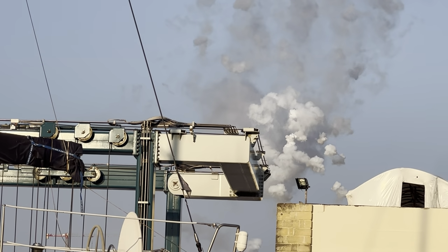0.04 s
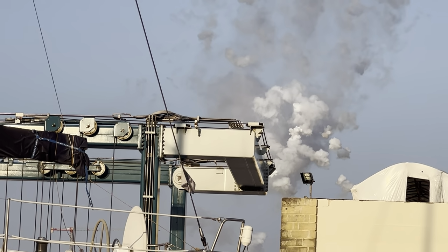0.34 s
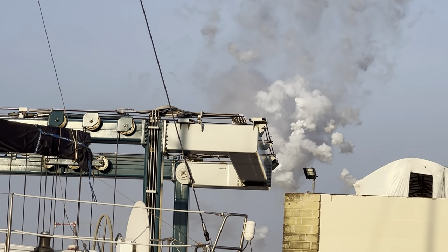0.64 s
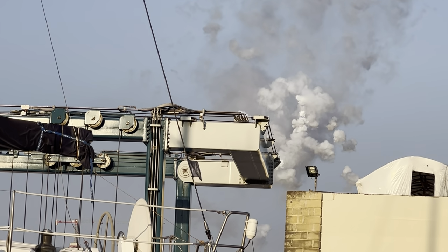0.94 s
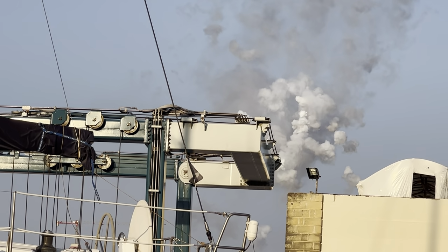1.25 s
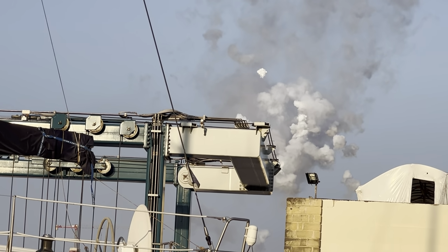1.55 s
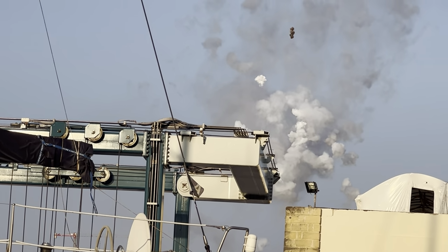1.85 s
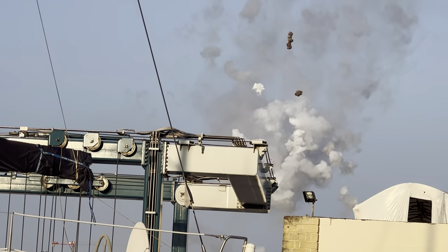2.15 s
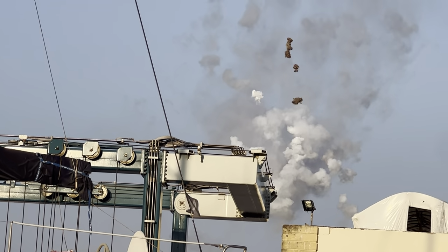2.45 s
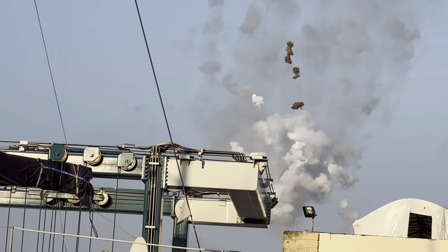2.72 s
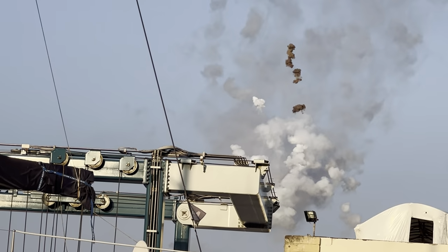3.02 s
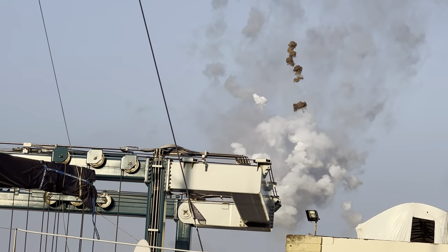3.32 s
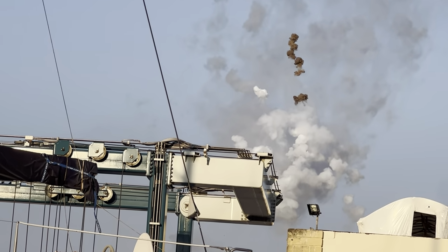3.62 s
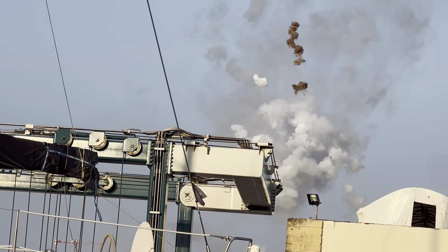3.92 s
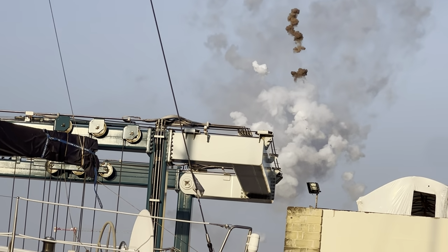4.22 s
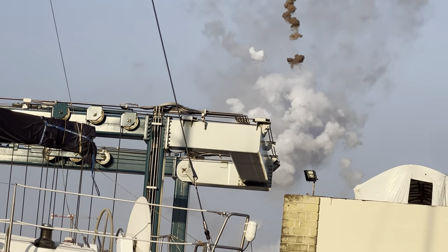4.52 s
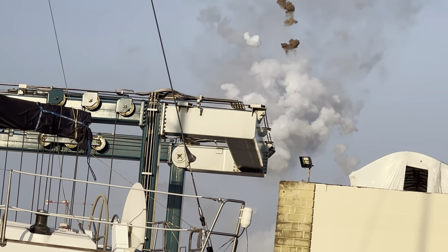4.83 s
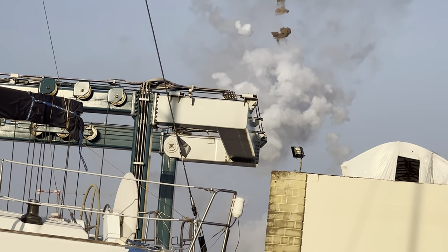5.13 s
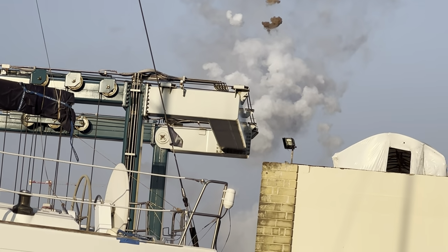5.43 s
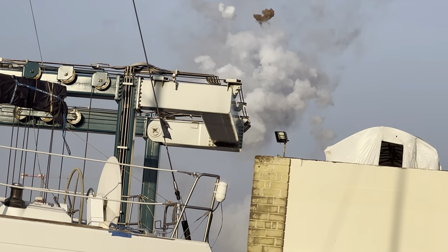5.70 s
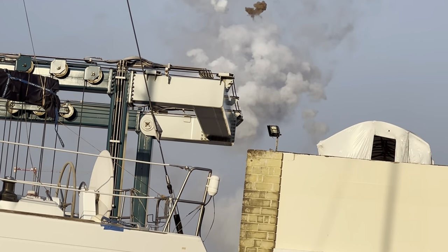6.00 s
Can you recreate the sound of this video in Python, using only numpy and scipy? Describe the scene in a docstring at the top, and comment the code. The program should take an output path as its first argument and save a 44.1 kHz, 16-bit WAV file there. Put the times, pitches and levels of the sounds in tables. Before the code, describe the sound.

Fireworks burst overhead in an open harbour, heard from the ground, with a low rumble and echoes of earlier shots already rolling at the start. Shells go off at about 0.3, 0.6, 0.7, 1.0, 1.4 and 1.5 seconds, each a sharp crack dropping into a deep boom. After a brief gap, more follow at 2.2 and 2.4 seconds, then four sharper, snappier ones at about 2.7, 3.2, 3.4 and 3.8 seconds. Nearby walls slap the shots back, boats and quays scatter them, and the far shore returns each as a duller rattling crack nearly a second later. Small snaps, ticks and distant thuds fall in between. The last shore echo arrives around 4.7 seconds. From there only muffled far thuds and a wide, lumpy rumble remain, growing duller and quieter until the end at about 6 seconds.

```python
"""A harbour by day, with firework shells bursting overhead: each is a sharp crack that sweeps down
into a deep boom. Nearby walls slap back, boats and quays scatter the sound, and the far shore
returns every shot nearly a second later. Small snaps, ticks and distant thuds fall in between.
The piled-up echoes roll on as a rumble that dulls and fades once the last shell has burst."""
import sys
import numpy as np
from scipy import signal
from scipy.fft import rfft, irfft, next_fast_len
from scipy.io import wavfile
from scipy.ndimage import uniform_filter1d, map_coordinates

SR = 44100
rng = np.random.default_rng(int(sys.argv[2]) if len(sys.argv) > 2 else 0)


def put_to_file(sound):
    """Save the sound as 16-bit audio at rate SR, in the file named by the first command-line argument."""
    columns = np.atleast_2d(sound).T  # one column per channel
    safe = np.clip(columns, -1, 1)
    whole_steps = np.round(safe * 32767)
    wavfile.write(sys.argv[1], SR, whole_steps.astype(np.int16))


N = 271656

# The shells overhead; those before time 0 leave only their echoes. Columns: start_s, crack_db,
# crack_length_s, knock_db, boom_db, shore_delay_s, shore_db, near_wall_db, far_wall_db
SHELLS = [(-.8, -9, .004, -6, -2, .885, .5, -30, -30), (-.5, -14.5, .004, -23, -1, .872, 4, -30, -30),
          (-.151, -10, .004, -24, -13, .884, -8, -30, -31),
          (.271, -8.5, .0036, -17, -.5, .869, 0, -23, -25.5),
          (.55, -13, .0058, -28, -3, .88, -2, -14.5, -33),
          (.661, -6, .005, -15.5, -.5, .885, -3.5, -28, -22),
          (1.045, -14, .0074, -14, -1, .893, 2.5, -20.5, -35),
          (1.3604, -8.5, .0044, -19.5, -1, .869, .5, -28, -22.5),
          (1.505, -13.5, .006, -12.5, -1.5, .887, 9, -28, -31),
          (2.1996, -15, 0.0044, -14, -2.5, .897, 6, -26, -30),
          (2.449, -14, .0061, -14.5, -1, .872, 3, -22, -30),
          (2.7011, -4.8, .0022, -8, -2, .869, -.8, -20, -27),
          (3.156, -2.2, 0.00073, -2.5, -9, .875, -8.5, -24, -31),
          (3.417, -6, .001, -8, -5, .884, -3.5, -24, -35),
          (3.7836, -2, .001, -5.5, -6, .876, -5.5, -26, -39)]
# The tone of the wash, the rushing sound of many blurred cracks: pitch_hz, level_db
WASH_TONE = [(290, -30.5), (500, -4.5), (812, -11.5), (969, -6), (1140, -6), (1480, -8.5), (2110, -15.5),
             (2840, -18.5), (3690, -26), (7760, -45), (8430, -47), (11000, -74), (18500, -120)]
# How wide echoes sound (side is what differs between the ears, mid what they share):
# pitch_hz, side_minus_mid_db
STEREO_WIDTH = [(50, -20), (125, -14.5), (300, -9), (450, -3.5), (600, 1.5), (950, 6), (1400, -4),
                (2000, -21), (4000, -24), (8000, -18)]


def amp(db):
    """Turn decibels into a gain to multiply by."""
    return 10 ** (np.asarray(db) / 20)


def along(points, hz):
    """Read a table of (pitch_hz, value) rows at any pitch, on a log scale."""
    pitches, values = np.transpose(points)
    return np.interp(np.log(hz + 1), np.log(pitches + 1), values)


def wobble(turns_per_s, count):
    """A smooth random curve, count samples long."""
    points = rng.standard_normal(int(count * turns_per_s / SR) + 4)
    curve = map_coordinates(points, [np.arange(0, count * turns_per_s / SR + 1, 1 / 8)], order=2)
    return np.interp(np.arange(count) * (8 * turns_per_s / SR), np.arange(len(curve)), curve)


def filtered(sound, gain_at):
    """Multiply each pitch in a sound by gain_at(hz)."""
    count = sound.shape[-1]
    size = next_fast_len(count + 8192)
    return irfft(rfft(sound, size) * gain_at(np.fft.rfftfreq(size, 1 / SR)), size)[..., :count]


def impulse(tone, size=2048):
    """A single click of energy 1 with the given tone."""
    cepstrum = np.fft.irfft(np.log(amp(along(tone, np.fft.rfftfreq(size, 1 / SR)))))
    cepstrum[1:size // 2] *= 2  # folding it in half packs the energy at the click's start
    cepstrum[size // 2 + 1:] = 0
    pulse = irfft(np.exp(rfft(cepstrum)))
    return pulse / np.linalg.norm(pulse)


def levelled(pair, window_s):
    """Hold the short-term power of a stereo sound at 1."""
    power = uniform_filter1d(np.mean(pair ** 2, 0), max(int(window_s * SR), 8))
    return pair / np.sqrt(np.abs(power) + 1e-12)


def steady_noise(tone, count, window_s=.038):
    """Even stereo noise that seems to come from all round."""
    size = next_fast_len(count, real=True)
    hz = np.fft.rfftfreq(size, 1 / SR)
    spectra = rng.standard_normal((2, 2 * len(hz))).view(complex) * amp(along(tone, hz))
    mid = irfft(spectra[0], size)[:count]
    side = irfft(spectra[1] * amp(along(STEREO_WIDTH, hz)), size)[:count]
    return levelled(np.array([mid + side, mid - side]), window_s)


def add(track, sound, start_s):
    """Mix a sound into the track, cutting off what falls outside it."""
    start = round(start_s * SR)
    lo, hi = max(start, 0), min(start + sound.shape[-1], N)
    if hi > lo:
        track[:, lo:hi] += sound[..., lo - start:hi - start]


def dulled(sound, db_per_khz):
    """Air soaks up the treble over a set distance."""
    return filtered(sound, lambda hz: amp(-db_per_khz * hz / 1000))


def through_air(sound, travel_s, air_db=1.28):
    """Air takes air_db per kHz for each second of travel; travel_s has one value per sample."""
    count = sound.shape[-1]
    hz, frame_s, spectra = signal.stft(sound, SR, nperseg=256)
    frame_travel_s = np.interp(frame_s, np.arange(count) / SR, travel_s)
    loss_db = air_db * np.outer(hz / 1000, frame_travel_s)
    return signal.istft(spectra * amp(-loss_db), SR, nperseg=256)[1][..., :count]


def rolling_echoes(lump_db=2.1, flutter_db=1.05, wash_swing=.72, dull_from_s=4.6):
    """Old echoes merge into a lumpy rumble and a wash that dulls once no new shots feed it."""
    # The rise and fall of the two layers: time_s, rumble_db, wash_db
    loudness = [(0.0, -19, -38), (0.39, -19.5, -38.5), (2.07, -23.5, -39.5), (2.59, -21, -38),
                (3.04, -24.5, -44), (3.36, -22, -42), (4.2, -25, -47), (4.68, -27.5, -47.5),
                (5.25, -31, -52.5), (5.59, -31.5, -54), (6.16, -33, -55.5)]
    # The rumble's tone: pitch_hz, level_db
    rumble_tone = [(13, -53.5), (22, -32), (27, -28), (35, -21.5), (40, -14), (53, 1.5), (70, 4.3),
                   (119, -.5), (201, -4.5), (255, -14.5), (292, -10.5), (350, -14), (800, -30.5),
                   (1040, -51), (1760, -120)]
    times_s, *levels = np.transpose(loudness)
    t = np.arange(N) / SR
    rumble_db, wash_db = [np.interp(t, times_s, column) for column in levels]
    wash_db = wash_db.mean() + wash_swing * (wash_db - wash_db.mean())  # less swing: the wash hangs on
    lumps = wobble(22, N)
    rumble = amp(rumble_db - .2 + lump_db * lumps) * steady_noise(rumble_tone, N, window_s=.06)
    wash = amp(wash_db + .2 + .5 * lumps + flutter_db * wobble(90, N)) * steady_noise(WASH_TONE, N)
    return rumble + through_air(wash, np.clip(t - dull_from_s, 0, .9), air_db=1.0)


def hump(t, rise_s):
    """A loudness curve that climbs to 1 at rise_s, then dies away."""
    return t / rise_s * np.exp(1 - t / rise_s)


def thuds():
    """Far thuds, and every shell's return from the hills, arrive smeared and dull."""
    # Single dull thuds from far off, many of them the shells' echoes off shore and hills:
    # start_s, deep_db, hollow_db, crack_db
    far_thuds = [(.208, -23, -17, -30.5), (.91, -18, -26, -51), (1.762, -21, -25, -44),
                 (2.555, -25, -22, -48), (3.052, -18.5, -37, -56.5), (3.328, -22, -19, -36),
                 (4.168, -21.5, -21.5, -54), (4.328, -24, -17, -44), (4.43, -24, -29, -56),
                 (4.635, -21, -38, -58), (4.695, -21, -23, -48), (4.76, -30, -30, -52),
                 (4.925, -26, -37, -58), (5.068, -24, -27.5, -49), (5.155, -28, -24.5, -50),
                 (5.44, -25, -40, -48), (5.625, -30, -30.5, -58), (5.765, -25, -36, -53),
                 (5.845, -36, -30, -55), (5.908, -29, -24.5, -54), (6.055, -33, -32, -58),
                 (6.112, -33, -32, -49)]
    # Echoes off shore and hills, relative to a shell's bass: delay_s, deep_db, hollow_db, crack_db
    hills = [(.905, -17, -18, -35), (1.289, -23, -30, -45), (1.366, -28, -30, -50), (1.48, -28, -28.5, -52),
             (1.655, -25, -34, -43), (2.069, -25, -28, -57)]
    # The tones of a thud's deep part and hollow part: pitch_hz, level_db
    deep_tone = [(25, -31.5), (60, -1), (100, 1.5), (150, -5.5), (250, -24.5), (1000, -88.5)]
    hollow_tone = [(80, -28), (150, 2), (195, 4), (240, -1), (300, -3.5), (380, -5), (500, -18.5),
                   (900, -32), (2500, -71)]
    arrivals = list(far_thuds)
    for start_s, _, _, knock_db, boom_db, *_ in SHELLS:
        for delay_s, *levels in hills:
            arrivals.append((start_s + delay_s, *(np.array(levels) + bass_level(knock_db, boom_db))))
    powers = np.zeros((3, N))
    shape = hump(np.arange(SR // 5) / SR, rise_s=.012)
    for start_s, *levels in arrivals:
        add(powers, np.outer(amp(levels), shape) ** 2, start_s)
    tones = [deep_tone, hollow_tone, WASH_TONE]
    sound = sum(np.sqrt(power) * steady_noise(tone, N) for power, tone in zip(powers, tones))
    return dulled(sound, db_per_khz=1.5)


def zings(pitch_hz=2900, waver_hz=380):
    """Evenly spaced ribs on the far shore return a crack as a few milliseconds of rough tone."""
    # The short rings: start_s, level_db
    rings = [(1.187, -28), (1.582, -32)]
    out, t = np.zeros((2, N)), np.arange(SR // 20) / SR
    for start_s, level_db in rings:
        hz = pitch_hz + waver_hz * wobble(1200, len(t))
        ring = hump(t, rise_s=.003) * np.sin(2 * np.pi * np.cumsum(hz) / SR)
        add(out, amp(level_db) * ring, start_s)
    return out


def ticks(fade_s=.009):
    """Each tick among the echoes is a tiny burst of bright noise."""
    # The ticks: start_s, level_db
    events = [(.061, -33), (1.105, -28), (1.189, -26), (1.242, -33), (1.309, -28.5), (2.271, -28),
              (2.783, -27), (3.043, -33), (3.496, -29), (3.576, -32), (4.712, -31)]
    # Their tone: pitch_hz, level_db
    tick_tone = [(300, -30), (1500, -3), (3000, 0), (5500, -1), (8300, -9), (11000, -16), (15000, -25)]
    out, t = np.zeros((2, N)), np.arange(SR // 40) / SR
    for start_s, level_db in events:
        burst = rng.standard_normal(len(t)) * amp(-60 * t / fade_s)
        tick = signal.fftconvolve(burst, impulse(tick_tone))
        add(out, amp(level_db + 6.5) * tick / np.linalg.norm(tick), start_s)
    return out


def snaps(air_db=2.7, face_spread_db=.8, face_travel_s=1.55, lead_samples=64):
    """Single snaps, and each shell's crack off the shore's flat faces: the farther, the duller."""
    # Single dulled snaps between the shells, many of them echoes off shore and walls:
    # start_s, level_db, travel_s
    dull_snaps = [(.072, -20, 1.3), (.107, -14, 1.0), (1.149, -13.5, 1.4), (1.688, -21.5, 1.4),
                  (1.767, -20, 1.3), (2.082, -20, 1.5), (2.395, -16, 1.4), (3.109, -16.5, 1.4),
                  (3.332, -16, 1.5), (3.474, -18, 1.2), (3.726, -20, 1.36), (3.945, -23, 1.1)]
    # Flat faces on the far shore, relative to its echo: delay_s, level_db
    shore_faces = [(.001, -11.5), (.034, -8.5), (.052, -6)]
    out, arrivals = np.zeros((2, N)), list(dull_snaps)
    for start_s, crack_db, _, _, _, shore_s, shore_db, *_ in SHELLS:
        for delay_s, face_db in shore_faces:
            level_db = crack_db + shore_db + face_db + face_spread_db * rng.standard_normal()
            arrivals.append((start_s + shore_s + delay_s, level_db, face_travel_s))
    for start_s, level_db, travel_s in arrivals:
        sharp = crack(0, length_s=.004, front_weight=.2, fade_s=.025)
        snap = dulled(np.pad(sharp, (lead_samples, 0)), air_db * travel_s)
        add(out, amp(level_db + 10) * snap / np.linalg.norm(snap), start_s - lead_samples / SR)
    return out


def swell(outline, edge_s=.0023):
    """The loudness curve of a group of echoes, from its (time_s, level_db) rows."""
    times_s, level_db = np.transpose(outline)
    t = np.arange(int(times_s[-1] * SR)) / SR
    return amp(np.interp(t, times_s, level_db)) * np.tanh(t / edge_s) * np.tanh((t[-1] - t) / edge_s)


def rattle(count, delay_s, faces_per_s=650, spread_db=4.5, fade_s=.004, blur_db=-3):
    """A crack returns as rough bursts from many faces over a blur of tiny ones, later ones duller."""
    # The tone of scattered cracks: pitch_hz, level_db
    echo_tone = [(100, -18), (400, 4.5), (750, -4), (1400, 1.5), (2000, -6), (3000, -9.5), (5000, -18),
                 (8300, -28), (15000, -24)]
    hits = rng.random(count) < faces_per_s / SR
    sizes = hits * amp(spread_db * np.clip(rng.standard_normal(count), -2, 2))
    burst = amp(-60 * np.arange(SR // 100) / SR / fade_s)
    power = np.abs(signal.fftconvolve(sizes ** 2, burst ** 2)[:count])
    noise = np.sqrt(power) * rng.standard_normal((2, count))
    mid, side = filtered(noise, lambda hz: amp(along(echo_tone, hz)))
    side = filtered(side, lambda hz: amp(along(STEREO_WIDTH, hz)))
    clatter = np.array([mid + side, mid - side])
    clatter /= np.sqrt(np.mean(clatter ** 2) + 1e-20)
    blur = amp(blur_db) * steady_noise(echo_tone, count)
    return through_air(levelled(clatter + blur, window_s=.032), delay_s + np.arange(count) / SR)


def harbour_echoes(scatter_follow=.25):
    """Every burst scatters off boats and quays, then rattles back from the far shore; bass piles up."""
    # Scatter from boats, quays and hills: delay_s, level_db
    scatter = [(.008, -5.5), (.04, -13.5), (.09, -14.5), (.17, -18.5), (.3, -22.5), (.6, -25), (1.0, -25.5),
               (1.4, -31)]
    # The far shore's rattle, from its own start: time_s, level_db
    shore = [(0, -9), (.018, -2), (.036, -2), (.052, -3), (.075, -14), (.16, -25)]
    # The tone of the echoes' low end: pitch_hz, level_db
    bass_tone = [(25, -35.5), (45, -13.5), (65, -3), (120, -1), (190, 1), (240, -13), (300, -7.5),
                 (390, -9.5), (600, -21), (1000, -34.5), (3000, -69)]
    treble, bass_power = np.zeros((2, N)), np.zeros((1, N))
    near, far = swell(scatter), swell(shore)
    for start_s, crack_db, _, knock_db, boom_db, shore_s, shore_db, *_ in SHELLS:
        groups = [(near, 0, scatter_follow * crack_db - 21.9, -12.8),  # varies less than the crack
                  (far, shore_s, crack_db + shore_db - 21, -19)]
        for shape, delay_s, rattle_db, bass_db in groups:
            add(treble, amp(rattle_db) * shape * rattle(len(shape), delay_s), start_s + delay_s)
            bass_curve = amp(bass_level(knock_db, boom_db) + bass_db) * shape
            add(bass_power, bass_curve ** 2, start_s + delay_s)
    return treble + np.sqrt(bass_power) * steady_noise(bass_tone, N)


def bass_level(knock_db, boom_db, knock_share=.7):
    """The level in dB of a shell's whole low end, which drives its echoes."""
    return 10 * np.log10(amp(boom_db) ** 2 + knock_share * amp(knock_db) ** 2)


def crack(level_db, length_s, front_weight=.44, fade_s=.021):
    """The shock front, roughened by a few milliseconds of bounces off deck and rigging."""
    # The shock front's tone: pitch_hz, level_db
    front_tone = [(150, -19), (400, -2.5), (750, 0.5), (1200, 4.5), (2000, -1.5), (3000, -5), (5000, -13),
                  (8400, -18), (15000, -17)]
    t = np.arange(SR // 10) / SR
    bounces = rng.standard_normal(len(t)) * amp(-60 * np.maximum(t - length_s, 0) / fade_s)
    bounces /= np.linalg.norm(bounces)
    bounces[0] = front_weight * np.sqrt(.0026 / length_s)  # a shorter crack has a stronger front
    spectrum = rfft(bounces, 2 * len(t))
    broad_tone = np.sqrt(uniform_filter1d(np.abs(spectrum) ** 2, 90))
    bounces = irfft(spectrum / broad_tone)[:len(t)]  # keep only the fine ripples in the tone
    bounces /= np.linalg.norm(bounces)
    return amp(level_db + 11.5) * signal.fftconvolve(bounces, impulse(front_tone))[:len(t)]


def punch(level_db):
    """The mid-range smack that follows the front of a near shell."""
    # The smack's tone: pitch_hz, level_db
    smack_tone = [(120, -31.5), (330, 3), (620, 3.5), (1000, -7), (3000, -38), (9000, -65)]
    return amp(level_db + 4.2) * np.pad(impulse(smack_tone), (0, SR // 10))[:SR // 10]


def boom(knock_db, boom_db, sweep_s, sweep_cycles=1.94, end_hz=92, swell_s=.0086, knock_s=.011):
    """The blast wave: its low pitches arrive last, so a knock sweeps down into a few deep cycles."""
    t = np.arange(SR // 10) / SR
    peak_s = 3.65 * sweep_s
    hz = end_hz * (1 + .02 * rng.standard_normal()) + sweep_cycles / sweep_s * np.exp(-t / sweep_s)
    knock = amp(knock_db) * np.exp(-t / knock_s)
    body = np.exp(-((t - peak_s) / swell_s) ** 2)
    tail = .14 * np.exp(-((t - 2 * peak_s) / (2 * swell_s)) ** 2)
    fade_in = 1 - np.exp(-t / .0012)
    loudness = (knock + amp(boom_db - .7) * (body + tail)) * fade_in
    return loudness * np.cos(2 * np.pi * np.cumsum(hz) / SR)


def shells(rebound_s=.0198, rebound_db=6):
    """Every burst comes straight down, rebounds off the nearest building and slaps off the walls."""
    # The tone of the blast thrown back by the building: pitch_hz, level_db
    rebound_tone = [(25, -40), (70, -22), (160, -9), (300, 0), (420, 0), (650, -14), (1500, -36),
                    (5000, -65)]
    # The echoes off the near wall and the far wall: delay_s
    wall_delays_s = [.0725, .258]
    # How the bounce off the ground changes the tone: pitch_hz, gain_db
    ground_tone = [(110, -0.5), (190, 5), (270, -7), (400, -2), (650, 2.5), (1000, 0.5)]
    out = np.zeros((1, N))
    for start_s, crack_db, length_s, knock_db, boom_db, _, _, *slaps_db in SHELLS:
        sweep_s = .0047 * (length_s / .0045) ** .27  # a shorter crack also sweeps down sooner
        burst = crack(crack_db, length_s) + punch(knock_db) + boom(knock_db, boom_db, sweep_s)
        add(out, burst, start_s)
        rebound = amp(bass_level(knock_db, boom_db) + rebound_db) * impulse(rebound_tone)
        add(out, rebound, start_s + rebound_s)
        for delay_s, slap_db in zip(wall_delays_s, slaps_db):  # small faces reflect only short waves
            add(out, crack(slap_db, length_s=.0037, fade_s=.015), start_s + delay_s)
    return filtered(out, lambda hz: amp(along(ground_tone, hz)))


def scene():
    """All the sounds reach the microphone's left and right openings with different level and timing."""
    # Which side is louder: pitch_hz, left_minus_right_db
    balance = [(60, -0.6), (130, -1), (280, -1), (550, -4), (950, 3.5), (1400, 5.5), (2000, -0.5),
               (8000, 0)]
    # How far the left side's wave runs ahead: pitch_hz, lead_radians
    left_lead = [(100, .05), (400, .2), (700, 0), (1200, -.6), (1600, -.1), (2200, 0), (3000, -.55),
                 (4400, -.55), (5900, .3), (7400, .1), (8400, 1.3), (9100, 3.1), (10500, 4.2), (13000, 6.3)]
    sound = shells() + harbour_echoes() + snaps() + ticks() + zings() + thuds() + rolling_echoes()
    sides = np.array([[.5], [-.5]])
    return filtered(
        sound, lambda hz: amp(along(balance, hz) * sides) * np.exp(1j * along(left_lead, hz) * sides))


def record(dry, top_hz=15700):
    """The microphone rounds off the biggest peaks and loses most of the top octave."""
    # The microphone's treble: pitch_hz, gain_db
    treble = [(8500, 0), (9200, -4), (10500, -11), (13000, -18), (14200, -26), (15500, -28)]
    rounded = dry / (1 + np.abs(dry) ** 8) ** (1 / 8)
    return filtered(rounded, lambda hz: amp(along(treble, hz)) / (1 + (hz / top_hz) ** 40))


dry = scene()
out = record(dry)
put_to_file(out)
```